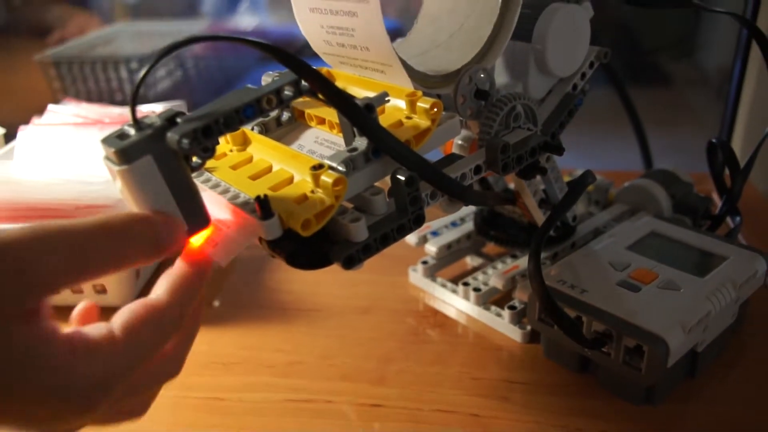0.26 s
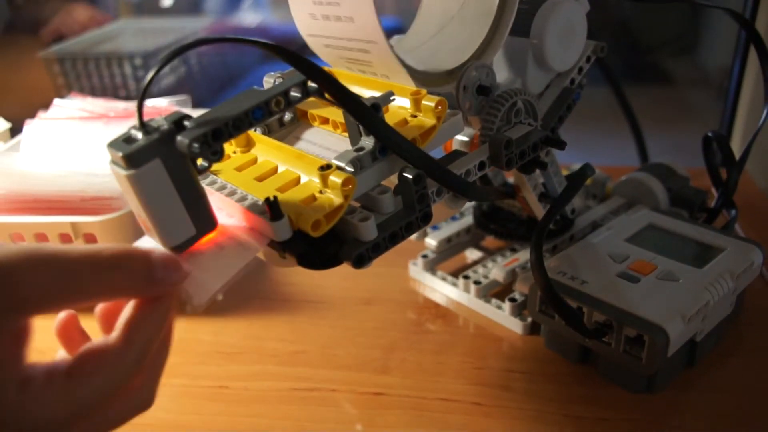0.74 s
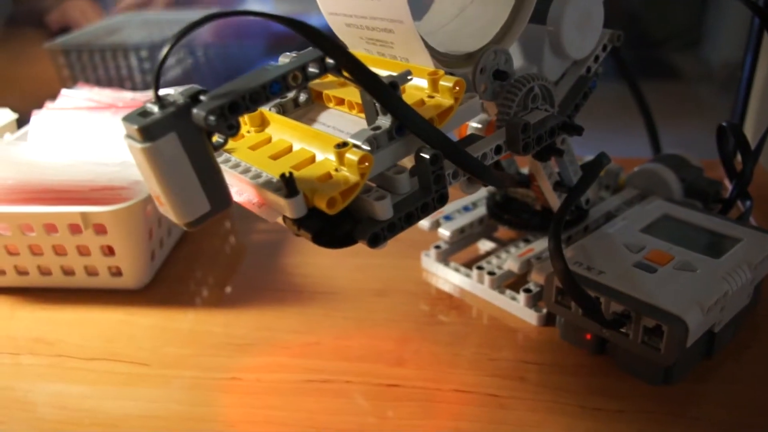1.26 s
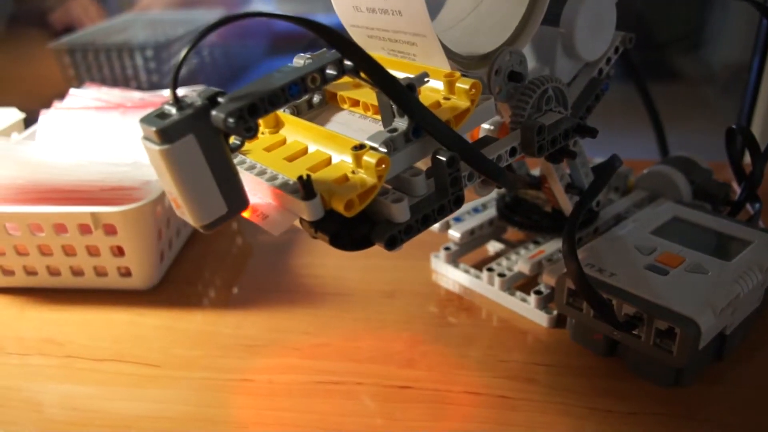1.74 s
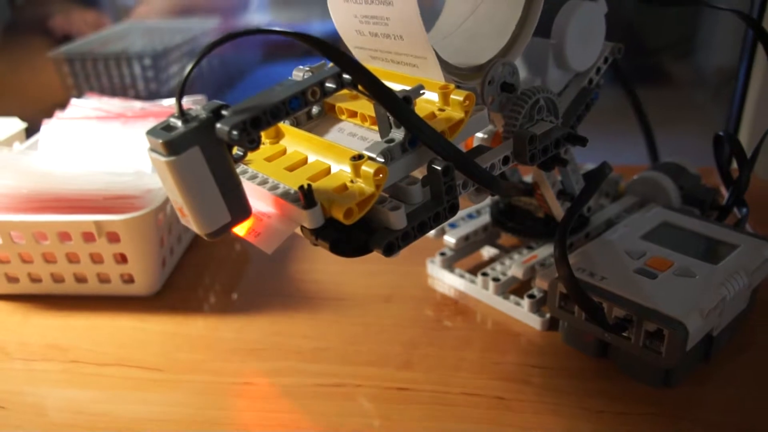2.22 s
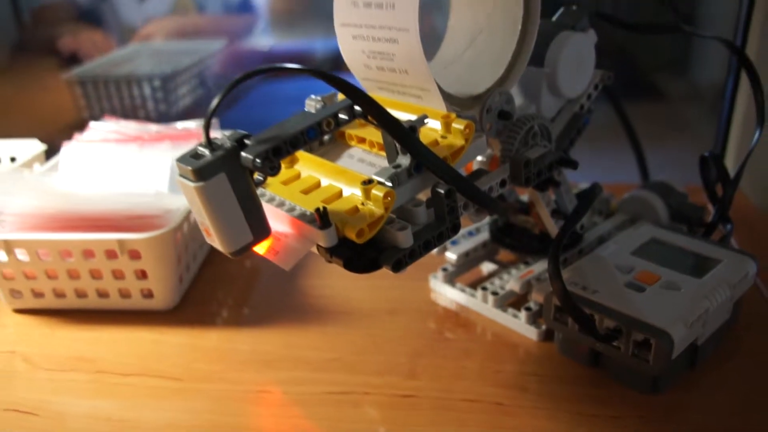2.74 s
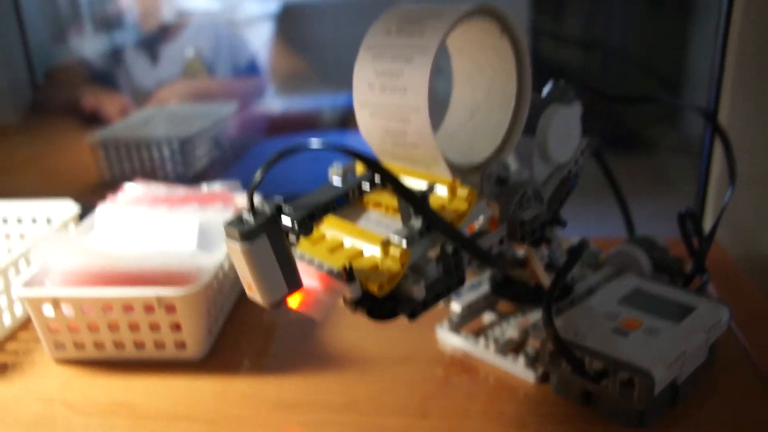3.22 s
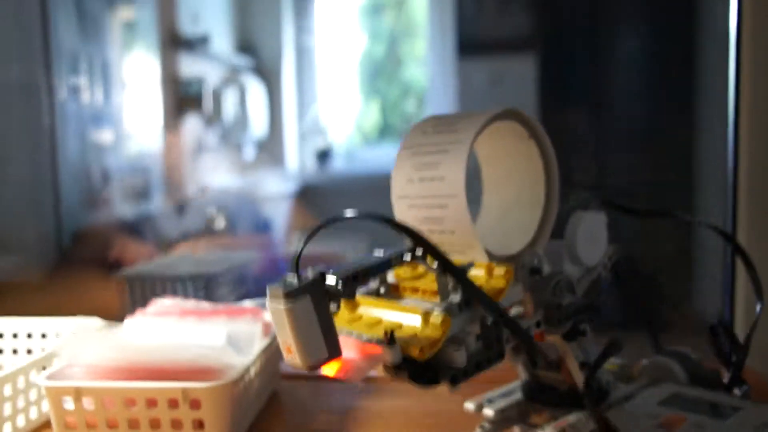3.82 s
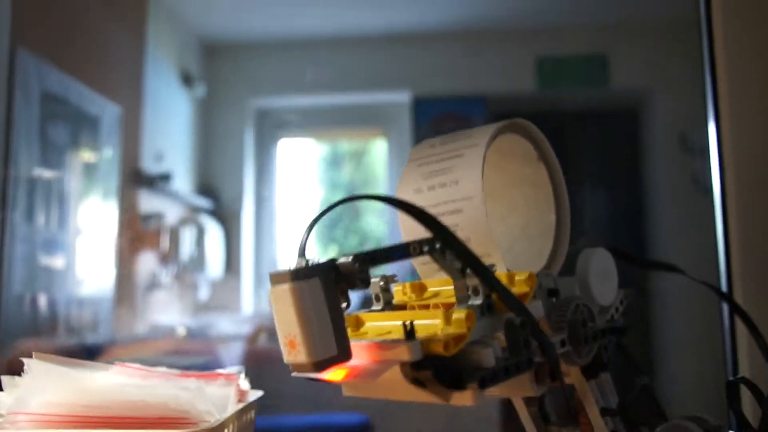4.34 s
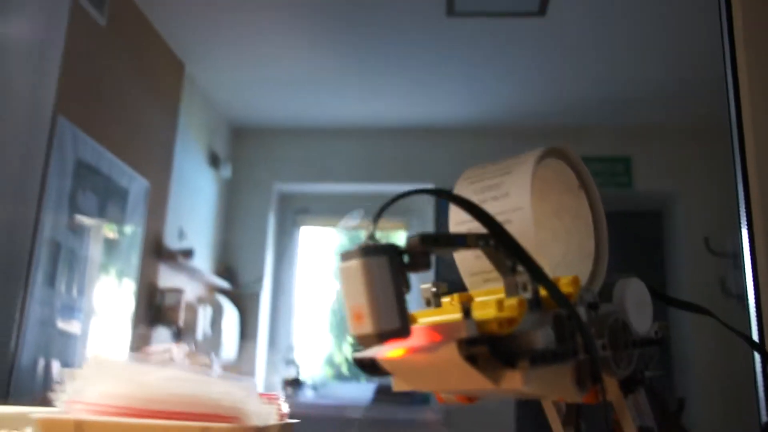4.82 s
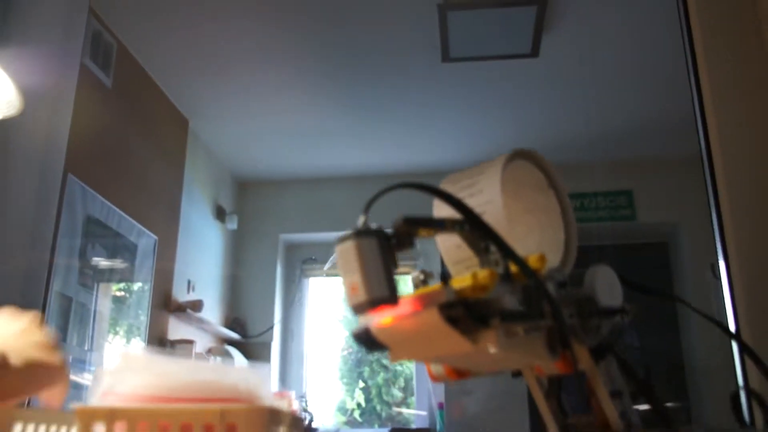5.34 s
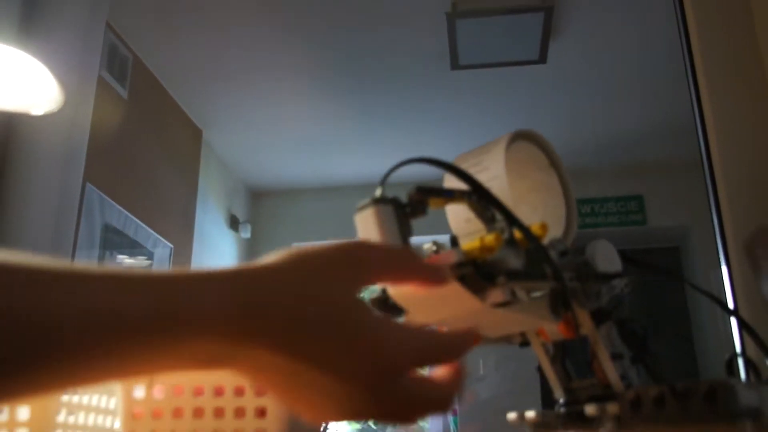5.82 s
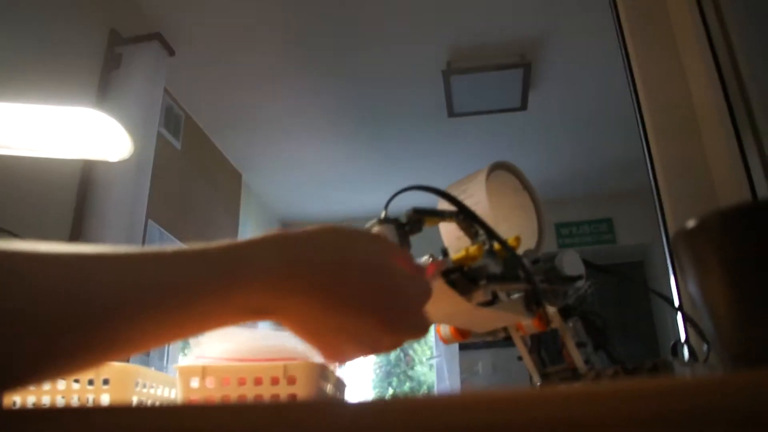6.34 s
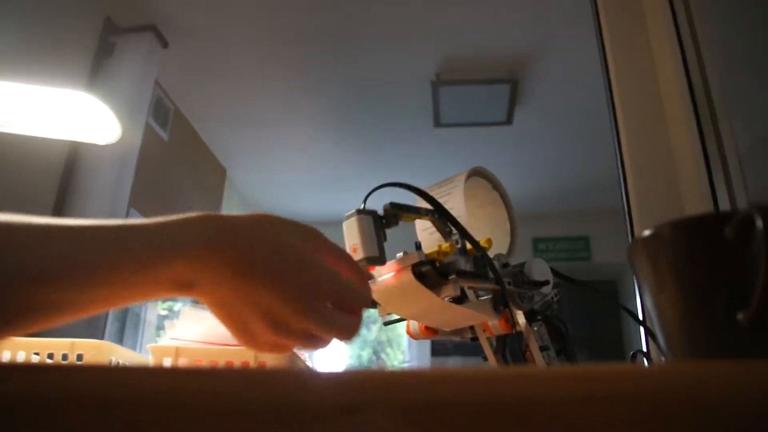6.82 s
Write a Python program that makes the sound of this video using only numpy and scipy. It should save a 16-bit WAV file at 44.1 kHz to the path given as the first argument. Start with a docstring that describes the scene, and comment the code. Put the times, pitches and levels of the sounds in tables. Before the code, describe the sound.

Quiet room air, a faint hum and a very thin, high electronic whine run throughout. A soft thump and bump come at 0.15 s, a tiny tick at 0.3. Around 0.6 a small plastic gear motor starts, with a clack at 0.7 and a dull bump at 0.77. At 0.83 a label rasps and snaps loose sharply. The motor eases after 1.2, with strong ringing clacks near 1.45, and stops at 2.2; more clacks follow to 2.5, one faint at 2.95. Around 3.6-3.9 paper rustles, parts clack and the motor stirs briefly. A close camera zoom purrs from 3.96 to 5.5, dragging with thin hiss near 5, ending in hard woody desk clunks at 5.5. The hum is now stronger. From 6.1 to 6.85 dry close ticks and paper crackles accompany a second zoom, with a brief feed and a clack near 6.77. A last short feed sounds around 7.0-7.2.

```python
"""Close on a wooden desk with a toy-brick label dispenser: air, a hum and a thin drive whine stand in the room.
A soft thump, a bump and a tick come first; the geared motor feeds tape and the plastic frame clacks.
Early in that run a label rasps and snaps off. Later paper rustles, the motor stirs briefly and close ticks fall.
A camera zoom whirs with clunks on the desk near its end, and the hum grows. More close ticks then fall through
a second zoom, with more rustle, a clack and two short feeds. Filtered noise, damped modes and wavering tones."""
import sys
import numpy as np
from scipy import signal
from scipy.fft import rfft, irfft
from scipy.io import wavfile

SR = 44100
rng = np.random.default_rng(int(sys.argv[2]) if len(sys.argv) > 2 else 0)


def unload_wav(signal):
    """Save mono or channel-first audio to the path in sys.argv[1] as 16-bit WAV at rate SR, clipped to [-1, 1]."""
    wavfile.write(
        sys.argv[1],
        SR,
        np.round(np.clip(np.atleast_2d(signal).T, -1, 1) * 32767).astype(np.int16),
    )


N = 311787
TIME = np.arange(N) / SR  # s
AGE = TIME[:SR * 2 // 3]  # s since a blow
TAPS = 4096
HZ = np.fft.rfftfreq(TAPS, 1 / SR)


def amp(db):
    """Decibels to gain."""
    return 10 ** (np.asarray(db) / 20)


def evened(x):
    """Scales to an rms of one."""
    return x / np.sqrt(np.mean(x ** 2) + 1e-20)


def read(points, hz):
    """Reads a table on a log-frequency axis."""
    f, value = np.transpose(points)
    return np.interp(np.log(hz + 1), np.log(f + 1), value)


def add(mix, s, sound):
    """Mixes a sound in at time s."""
    part = mix[:, round(s * SR):][:, :sound.shape[-1]]
    part += sound[..., :part.shape[1]]


def drift(hz):
    """Random wander of unit rms, holding only rates below hz."""
    spectrum = rfft(rng.standard_normal(N))
    slow = np.fft.rfftfreq(N, 1 / SR) < hz
    return evened(irfft(spectrum * slow, N))


def held(start, end, rise, fall):
    """Gain that rises until start, holds, and falls after end; slopes in dB per s."""
    return amp(-rise * np.maximum(start - TIME, 0) - fall * np.maximum(TIME - end, 0))


def pair(likeness, size):
    """White noise at two microphones, with a left-right correlation set at each frequency."""
    a, b = rfft(rng.standard_normal((2, size)))
    c = read(likeness, np.fft.rfftfreq(size, 1 / SR))
    return irfft([a, c * a + np.sqrt(1 - c ** 2) * b], size)


def colour(x, gain):
    """Causal minimum-phase filter with the given gain at each frequency of HZ."""
    both_sides = np.r_[gain, gain[-2:0:-1]]
    log_gain = np.log(np.maximum(both_sides, 1e-5))
    taps = np.fft.ifft(np.exp(np.conj(signal.hilbert(log_gain)))).real
    return signal.oaconvolve(x, taps[None, :TAPS // 2], axes=1)[:, :x.shape[1]]


def peak(hz, width_hz):
    """Resonance curve over HZ: one at its centre, half at the edges of its width."""
    return 1 / (1 + (2 * (HZ - hz) / width_hz) ** 2)


def peaks_db(peaks):
    """Summed decibel boosts of a table of resonances."""
    return sum(db * peak(f, width) for f, width, db in peaks)


def resonant(spectrum, peaks):
    """Gain of a broad spectrum with resonances on it, of unit power."""
    return evened(amp(read(spectrum, HZ) + peaks_db(peaks)))


def ring(modes):
    """Damped modes after one blow; parts this small radiate no bass."""
    swing = 0
    for f, db, t60 in modes:
        swing = swing + amp(db - 60 * AGE / t60) * np.sin(2 * np.pi * f * AGE)
    return signal.sosfilt(signal.butter(3, 420, "high", fs=SR, output="sos"), swing)


# left-right likeness of sound close to the microphones: f/Hz, correlation
NEAR_LIKENESS = [(100, 1), (1000, 1), (3000, 0.1), (6000, 0.082), (15000, .05)]
# left-right likeness of the echoes: f/Hz, correlation
ECHO_LIKENESS = [(600, 0.86), (1200, 0.8), (2200, 0), (4000, 0)]
# how the room dies away: f/Hz, t60/s
ROOM_DECAY = [(150, 0.82), (800, 0.46), (2000, 0.7), (4500, 0.69), (9000, 0.6), (15000, 0.36)]


def blow(decay, room_db, rise, early_db, early_decay):
    """A short chattering contact, strong echoes off the desk and walls, then the room dying band by band."""
    contact = pair(NEAR_LIKENESS, len(AGE)) * np.exp(-AGE / decay) * (1 - np.exp(-AGE / rise))
    hz, t, bands = signal.stft(pair(ECHO_LIKENESS, len(AGE)), SR, nperseg=256)
    dying = bands * amp(-60 * t / read(ROOM_DECAY, hz)[:, None])
    tail = signal.istft(dying, SR, nperseg=256)[1][:, :len(AGE)]
    echoes = np.repeat(rng.exponential(1, len(AGE)), 64)[:len(AGE)]  # strength redrawn every 64 samples
    early = np.sqrt(1 + amp(early_db) * echoes * np.exp(-AGE / early_decay))
    swell = (1 - np.exp(-AGE / 0.0026)) * early
    return contact + amp(room_db) * tail * swell / 2


# left-right likeness of diffuse sound: f/Hz, correlation
DIFFUSE_LIKENESS = [(60, .15), (170, 0.063), (700, 0.48), (1300, 0.5), (2200, 0.066), (4000, 0.01),
                    (15000, 0.05)]
# colour of the air noise: f/Hz, relative level/dB
AIR_COLOUR = [(25, -20.5), (100, -29), (170, -22.5), (250, -14), (450, -11), (1000, -9.5), (1500, -16),
              (2900, -12.5), (4200, -17), (7500, -28), (15500, -37.5)]
# appliance hum, once the camera faces it: f/Hz, mean level/dB
HUM_TONES = [(242.5, -66.5), (963.6, -68)]
# the camera turns towards the hum: full from (s), growth (dB per s), level before (dB)
HUM_FULL_S, HUM_DB_PER_S, HUM_BEFORE_DB = 4.9, 12, -6


def room_tone(air_db=-54.5):
    """Steady air noise and the hum of an appliance, louder once the camera faces it."""
    air = amp(air_db) * colour(pair(DIFFUSE_LIKENESS, N), evened(amp(read(AIR_COLOUR, HZ))))
    hum = 0
    for f, db in HUM_TONES:
        hum = hum + amp(db + 1.5 * drift(4)) * np.sin(2 * np.pi * f * TIME + .5 * drift(3.7))
    facing = amp(np.clip(HUM_DB_PER_S * (TIME - HUM_FULL_S), HUM_BEFORE_DB, 0))
    return air + np.sqrt(2) * facing * hum * amp([[-1], [1]])  # hum 2 dB stronger on the right


# feed motor runs: up to speed t/s, slows t/s, stops t/s, level/dB before the feed's trim
FEED_RUNS = [(0.595, 1.198, 2.22, -42.5), (3.575, 3.72, 3.9, -53.5), (6.54, 6.618, 6.64, -51.5),
             (7.016, 7.1, 7.2, -44.5)]
# every run spins up, eases off to a creep and stops
SPIN_UP_DB_PER_S, EASE_DB_PER_S, CREEP_DB, STOP_DB_PER_S = 100, 44, -13, 78


def feed_effort():
    """How hard the feed motor works: spin-up, full speed, creep, stop."""
    effort = 0
    for up, slows, stop, db in FEED_RUNS:
        easing_db = np.clip(EASE_DB_PER_S * (slows - TIME), CREEP_DB, 0)
        effort = effort + held(up, stop, SPIN_UP_DB_PER_S, STOP_DB_PER_S) * amp(db + easing_db)
    return effort


def whine(hz=8048, idle_db=-71.5, half_db=-48):
    """The motor's thin switching tone, unsteady at each microphone; it halves where feed effort is half_db."""
    gain = amp(idle_db) / (1 + feed_effort() / amp(half_db))
    ports = []
    for _ in range(2):
        flutter = amp(2.2 * drift(30))
        wander = .6 * drift(3) + .5 * drift(70)  # rad
        ports.append(flutter * np.sin(2 * np.pi * hz * TIME + wander))
    return np.sqrt(2) * gain * np.array(ports)


# bumps on the desk: t/s, level/dB, f/Hz above which it turns dull
DESK_BUMPS = [(0.166, -42.5, 1100), (0.766, -29, 745), (5.328, -33, 2110), (5.498, -28.5, 2100),
              (5.509, -14, 2070), (5.526, -13, 1950), (6.026, -39.5, 2100)]
# colour of a bump: f/Hz, relative level/dB
BUMP_COLOUR = [(60, -41), (150, -27), (230, -10), (330, -3), (540, -4.5), (720, 9.5), (1100, 5.5),
               (1500, 7), (2000, 5), (2600, 6.5), (4000, 9), (6000, -2), (15000, -22.5)]
# resonances of the desk top: f/Hz, width/Hz, boost/dB
DESK_PEAKS = [(724, 39, 4.5), (834, 33, 5.5), (1115, 61, 6.5)]


def knocks(edge_db=-17.5, edge_per_level=-0.32, room_db=-4.5,
           thump_s=.143, thump_db=-52, thump_hz=165, thump_width_hz=75):
    """The desk top answers each bump with a woody burst, duller if heavier, and a soft hand with a low thump."""
    out = np.zeros((2, N))
    wood = resonant(BUMP_COLOUR, DESK_PEAKS)
    for s, db, hz in DESK_BUMPS:
        tilt = read([(hz, 0), (hz * np.sqrt(2), edge_db + edge_per_level * db)], HZ)
        burst = blow(0.0092, room_db, rise=0.0014, early_db=15.0, early_decay=0.022)
        add(out, s, amp(db) * colour(burst, wood * amp(tilt)))
    push = blow(.018, -10, rise=.004, early_db=6, early_decay=.02)
    add(out, thump_s, amp(thump_db) * colour(push, evened(peak(thump_hz, thump_width_hz))))
    return out


# dry ticks close to the microphone: t/s, level/dB before trim, sparkle/dB, pitch f/Hz
CLOSE_TICKS = [(0.292, -49.5, 3, 1870), (3.9555, -34, -3, 4060), (3.961, -32.5, -4, 4510),
               (3.9754, -36, -11, 4650), (6.114, -38, -11, 1710), (6.1673, -27.5, -34, 1100),
               (6.2156, -34, 2, 2880), (6.2436, -32, -24, 975), (6.271, -33.5, -8, 3800),
               (6.4197, -40, -2, 1180), (6.4914, -38, -34, 1150), (6.6576, -30.5, -36, 2080),
               (6.7337, -29.5, -4.5, 6300), (6.7424, -32.5, -16, 4460), (6.8364, -35.5, -4, 1240)]
# colour of a tick: f/Hz, relative level/dB
TICK_COLOUR = [(100, -17), (400, -1.5), (900, 9), (3000, 10), (4500, 3.5), (6500, 3.5), (8700, 9),
               (10500, -7), (15500, -13)]


def ticks(trim_db=4, body_db=-9, body_per_sparkle=-0.18, part_db=8, part_width_hz=900, left_db=0.7):
    """Small close ticks: lens clicks, finger taps and paper crackles with little room; the duller have more body."""
    out = np.zeros((2, N))
    for s, db, sparkle, hz in CLOSE_TICKS:
        body = body_db + body_per_sparkle * sparkle
        tilt = read([(1800, body), (3000, 0), (5200, 0), (7500, sparkle)], HZ)
        gain = amp(read(TICK_COLOUR, HZ) + tilt + part_db * peak(hz, part_width_hz))
        contact = blow(0.0025, -23.5, rise=0.00069, early_db=25.5, early_decay=0.02)
        add(out, s, amp(db + trim_db) * colour(contact, gain))
    return out * amp([[left_db], [-left_db]])


# colour of the rubbing gears: f/Hz, relative level/dB
GEAR_COLOUR = [(120, -62), (200, -34), (231, -49), (422, -13.5), (596, -12.5), (1090, -6), (1350, -4.5),
               (1710, -3), (2380, -5.5), (2800, 3), (3480, -8), (3890, 1.5), (5590, -10.5), (6470, -14),
               (15500, -33.5)]
# resonances of the gearbox: f/Hz, width/Hz, boost/dB
GEARBOX_PEAKS = [(1745, 39, 7.5), (2920, 330, 2.5), (4320, 600, 0.5), (5570, 160, 10.5)]


def feed(trim_db=2, teeth_hz=190, mesh=0.21, flutter_db=0.5, tone_db=-17, tone_hz=1740, tone_waver=0.016):
    """Plastic gears rub tooth by tooth, drawing tape through the frame; the fastest one sings unsteadily."""
    turns = np.cumsum(teeth_hz * (1 + 0.0638 * drift(8.57))) / SR
    toothed = 1 + mesh * np.cos(2 * np.pi * turns)
    rub = pair(DIFFUSE_LIKENESS, N) * toothed * amp(flutter_db * drift(45))
    tone_turns = np.cumsum(tone_hz * (1 + tone_waver * drift(38.6))) / SR
    tone = amp(tone_db + 2.5 * drift(15)) * np.sin(2 * np.pi * tone_turns)
    gears = colour(rub, resonant(GEAR_COLOUR, GEARBOX_PEAKS))
    return amp(trim_db) * feed_effort() * (gears + tone)


# frame clacks: t/s, level/dB, body/dB, sparkle/dB (level and body before trim), struck part's pitch f/Hz
FRAME_CLACKS = [(0.7061, -30, 1, -17, 4430), (0.959, -33.5, -19, -32, 3970), (1.3875, -26, -7, -21, 3700),
                (1.4449, -30, -7, -13, 3840), (1.4561, -21, -7, -27, 3703), (2.2418, -33, -8.5, -25, 4540),
                (2.365, -39.5, -22, -22, 4020), (2.4023, -38, -18, -18.5, 4263),
                (2.4642, -16.5, -11, -20.5, 5070), (2.505, -19.5, -10.5, -11.5, 4370),
                (2.9473, -34.5, -10.5, -28, 3890), (3.5742, -33, -27, -20, 3770),
                (3.6576, -26.5, -14.5, -16.5, 4740), (3.7288, -26.5, -11, -17, 4400),
                (6.774, -26.5, -4, -19.5, 4250)]
# colour of a clack: f/Hz, relative level/dB
CLACK_COLOUR = [(100, -33), (300, -18), (560, -4.5), (760, 1), (1300, 1), (2200, 0.5), (3200, -3),
                (4100, -3), (5300, -5.5), (7000, 3.5), (10000, 2.5), (15500, -9.5)]
# the latch springs back and rings on: t/s, level/dB (before the left-right balance)
LATCH_SPRING = (1.457, -33.5)
# modes of the latch: f/Hz, level/dB, t60/s
LATCH_RING = [(1742, -8, .25), (3760, -2, .3), (3836, 0, .33), (3975, 1, .3), (4925, -5, .2)]
# a struck part falls back once in its play: delay (s), level (dB)
REBOUND_S, REBOUND_DB = 0.0068, -7


def clacks(trim_db=1.5, body_trim_db=-1, part_db=7, part_width_hz=700, desk_share=0.4, room_db=-7.5, left_db=0.9):
    """Frame beams and gears jump in their play and fall back, ringing at their pitch and shaking the desk."""
    out = np.zeros((2, N))
    desk = desk_share * peaks_db(DESK_PEAKS)
    for s, db, body, sparkle, hz in FRAME_CLACKS:
        tilt = read([(1600, body + body_trim_db), (3000, 0), (5200, 0), (8000, sparkle)], HZ)
        gain = amp(read(CLACK_COLOUR, HZ) + tilt + desk + part_db * peak(hz, part_width_hz))
        for delay, drop in (0, 0), (REBOUND_S, REBOUND_DB):
            crack = colour(blow(0.0077, room_db, rise=0.00017, early_db=23, early_decay=0.032), gain)
            add(out, s + delay, amp(db + drop + trim_db) * crack)
    latch_s, latch_db = LATCH_SPRING
    add(out, latch_s, amp(latch_db) * ring(LATCH_RING))
    return out * amp([[left_db], [-left_db]])


# the label tears free in quick slips: t/s, level/dB
LABEL_SLIPS = [(.8331, -9), (.83414, -10), (.83518, -12)]
# what the slips shake: f/Hz, level/dB, t60/s
SLIP_RING = [(870, -2.5, 0.007), (2890, -3.5, 0.012), (4100, -5.5, 0.012), (9900, -17, 0.0032)]
# colour of the snap: f/Hz, relative level/dB
SNAP_COLOUR = [(60, -73), (200, -31), (550, -11), (740, 0), (1020, 0.5), (1400, -10.5), (2200, -13.5),
               (2900, 1), (3500, -9.5), (4200, -9), (5800, -15.5), (15000, -29.5)]


def snap(echo_db=-6, peel_db=-20, peel_hz=4200, peel_time=0.0069):
    """The glue peels in a swelling rasp, the label lets go and the sprung frame flicks back on the desk."""
    out, release = np.zeros((2, N)), LABEL_SLIPS[0][0]
    for s, db in LABEL_SLIPS:
        add(out, s, amp(db) * ring(SLIP_RING))
    flick = blow(0.022, -6.0, rise=0.00032, early_db=27, early_decay=0.02)
    add(out, release, amp(echo_db) * colour(flick, amp(read(SNAP_COLOUR, HZ))))
    swell = np.exp(-abs(TIME - release) / peel_time) * (TIME < release)
    rasp = colour(pair(NEAR_LIKENESS, N) * swell, resonant(SNAP_COLOUR, [(peel_hz, 1200, 10)]))
    return out + amp(peel_db) * rasp


# paper rustles: peak t/s, level/dB
PAPER_RUSTLES = [(3.64, -63), (6.23, -64), (6.74, -55.5)]
# each swells quickly and fades slowly, until the last stops
RUSTLE_RISE_DB_PER_S, RUSTLE_FALL_DB_PER_S, RUSTLE_END_S = 115, 22, 6.84


def rustle(per_s=170, spread_db=5, decay=0.00032, sparks_per_s=28, spark_db=-2, spark_hz=8500, spark_width_hz=700):
    """Paper sticks and slips in a spray of tiny ticks, with a few brighter crackles among them."""
    swell = sum(amp(db) * held(s, s, RUSTLE_RISE_DB_PER_S, RUSTLE_FALL_DB_PER_S) for s, db in PAPER_RUSTLES)
    swell = swell * (TIME < RUSTLE_END_S)
    happens = rng.random(N) < per_s / SR
    sizes = amp(spread_db * np.minimum(rng.exponential(1, N), 3)) * happens
    slips = signal.lfilter([1], [1, -np.exp(-1 / (decay * SR))], sizes)
    spray = evened(colour(pair(DIFFUSE_LIKENESS, N) * slips, resonant(TICK_COLOUR, [(7860, 740, 5)])))
    catches = rng.standard_normal((2, N)) * (rng.random(N) < sparks_per_s / SR)
    sparks = evened(colour(catches, peak(spark_hz, spark_width_hz)))
    return swell * (spray + amp(spark_db) * sparks)


# zoom runs: start t/s, stop t/s, level/dB before trim
ZOOM_RUNS = [(3.964, 5.52, -48), (6.135, 6.83, -48.5)]
# left-right likeness of sound inside the camera body: f/Hz, correlation
INSIDE_LIKENESS = [(170, 0.79), (400, 0.019), (1150, 0.45), (2000, -0.53), (3000, -0.1), (15000, 0.018)]
# colour of the lens drive: f/Hz, relative level/dB
LENS_COLOUR = [(88, -67), (150, -45), (239, -11.5), (352, -12.5), (471, -4.5), (618, -11), (695, -3.5),
               (1130, -3), (1370, -1), (1940, -6), (2360, -9), (2810, -4.5), (4480, -10), (13300, -32.5),
               (15500, -64)]
# resonances of the zoom drive: f/Hz, width/Hz, boost/dB
LENS_DRIVE_PEAKS = [(464, 75, 7.8), (710, 57, 1.1), (1133, 88, 6.3), (1292, 49, 7.4), (1955, 240, 6.5)]
ZOOM_START_DB_PER_S, ZOOM_STOP_DB_PER_S = 385, 280
# near the end of its travel the lens drags and hisses: peak (s), build-up and easing (dB per s)
DRAG_S, DRAG_RISE_DB_PER_S, DRAG_FALL_DB_PER_S = 4.955, 70, 14


def zoom(trim_db=4.5, teeth_hz=141, mesh=0.11, flutter_db=1, tone_db=-13, tone_hz=1143,
         hiss_hz=12800, hiss_db=-10, drag_db=2.5):
    """The lens drive purrs in the camera body with a wavering gear tone; drag adds level and a thin hiss."""
    running = sum(amp(db) * held(start, stop, ZOOM_START_DB_PER_S, ZOOM_STOP_DB_PER_S)
                  for start, stop, db in ZOOM_RUNS)
    drag = held(DRAG_S, DRAG_S, DRAG_RISE_DB_PER_S, DRAG_FALL_DB_PER_S)
    turns = np.cumsum(teeth_hz * (1 + 0.047 * drift(12.1))) / SR
    toothed = 1 + mesh * np.cos(2 * np.pi * turns)
    rub = pair(INSIDE_LIKENESS, N) * toothed * amp(flutter_db * drift(81))
    tone_turns = np.cumsum(tone_hz * (1 + 0.01188 * drift(31.3))) / SR
    tone = amp(tone_db + 2.8 * drift(5.3)) * np.sin(2 * np.pi * tone_turns)
    hiss_gain = resonant([(1000, -21), (9000, 8), (16000, -5)], [(hiss_hz, 2500, 6)])
    hiss = colour(pair(INSIDE_LIKENESS, N), hiss_gain)
    drive = colour(rub, resonant(LENS_COLOUR, LENS_DRIVE_PEAKS)) + tone
    purr = amp(trim_db + drag_db * drag) * drive * amp([[.6], [-.6]])  # slightly left
    return running * (purr + amp(hiss_db) * drag * hiss)


def scene():
    """Room, machine, desk and camera together."""
    return room_tone() + whine() + knocks() + ticks() + feed() + clacks() + snap() + rustle() + zoom()


# dips in the microphone's response: f/Hz, width/Hz, depth 0-1
MICROPHONE_DIPS = [(613, 65, 0.6), (1369, 187, 0.75), (2386, 260, 0.88), (3413, 354, 0.67)]


def record(dry, edge_hz=15830):
    """The microphone's narrow dips, then the band limit."""
    response = np.prod([1 - depth * peak(f, width) for f, width, depth in MICROPHONE_DIPS], axis=0)
    edge = signal.firwin(511, edge_hz, window=("kaiser", 9), fs=SR)
    return signal.oaconvolve(colour(dry, response), edge[None], "same", axes=1)


dry = scene()
out = record(dry)
unload_wav(out)
```